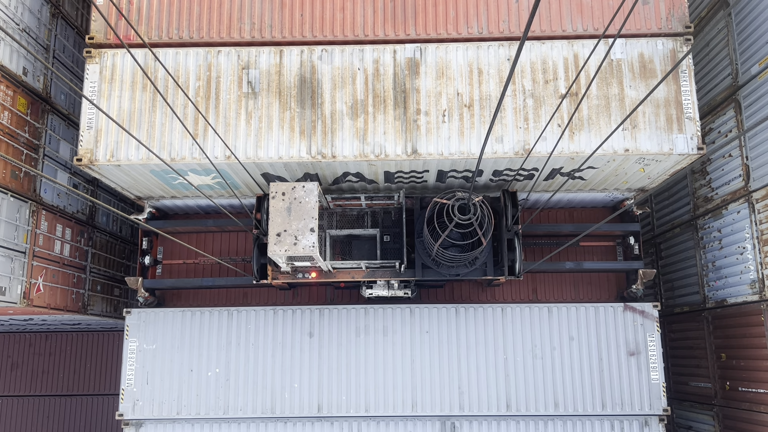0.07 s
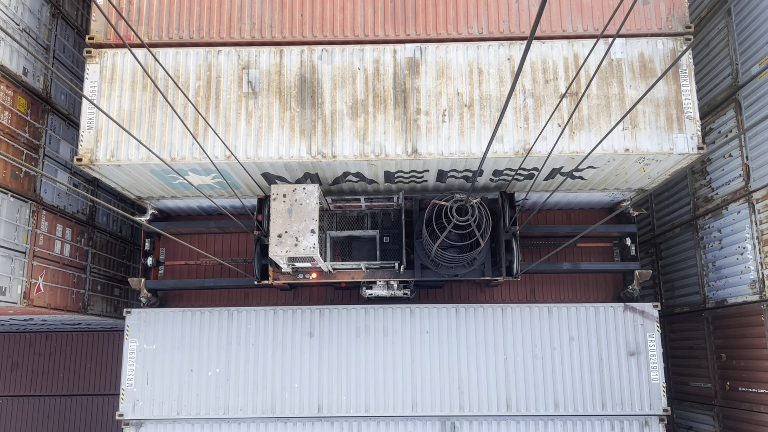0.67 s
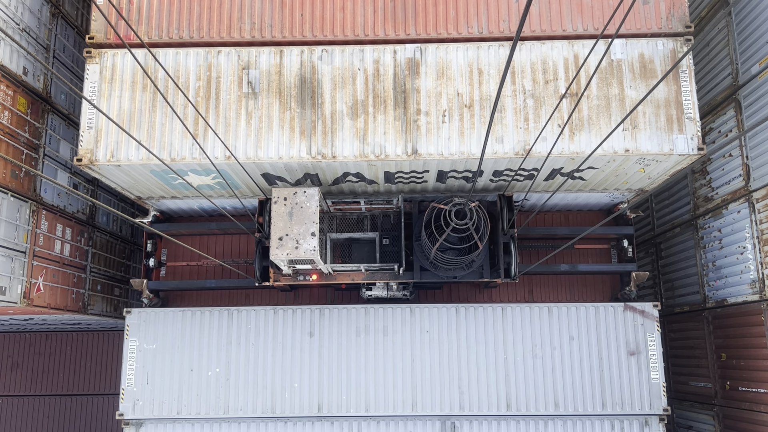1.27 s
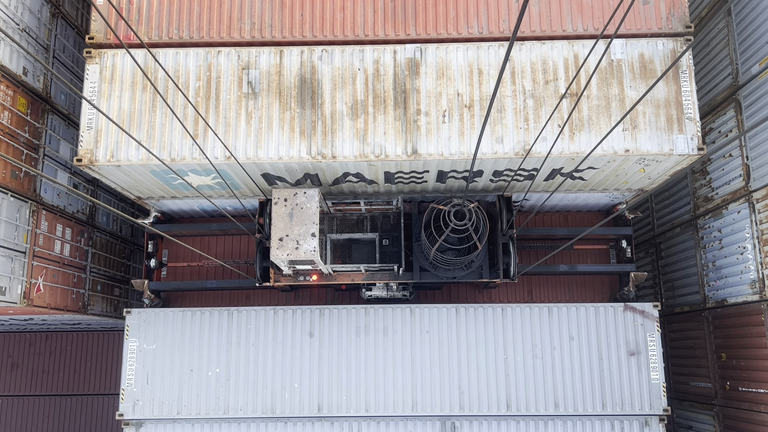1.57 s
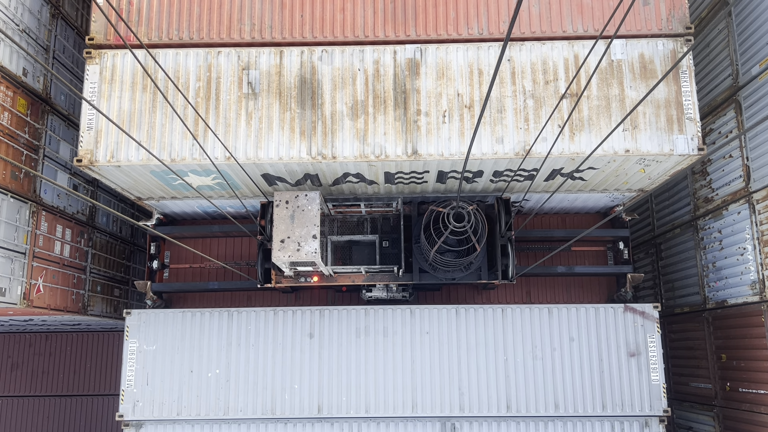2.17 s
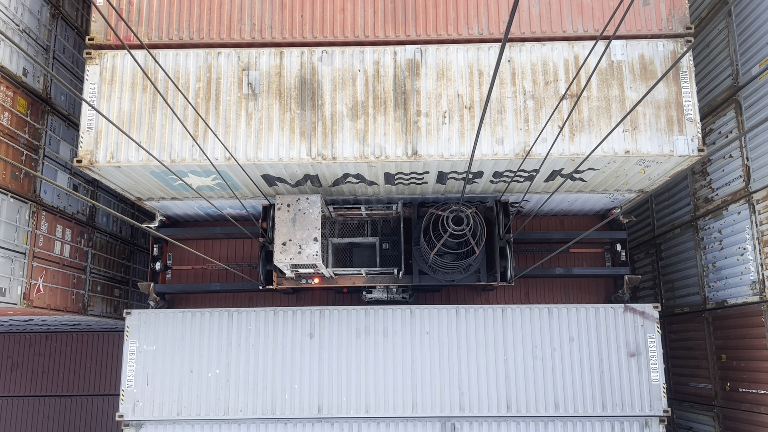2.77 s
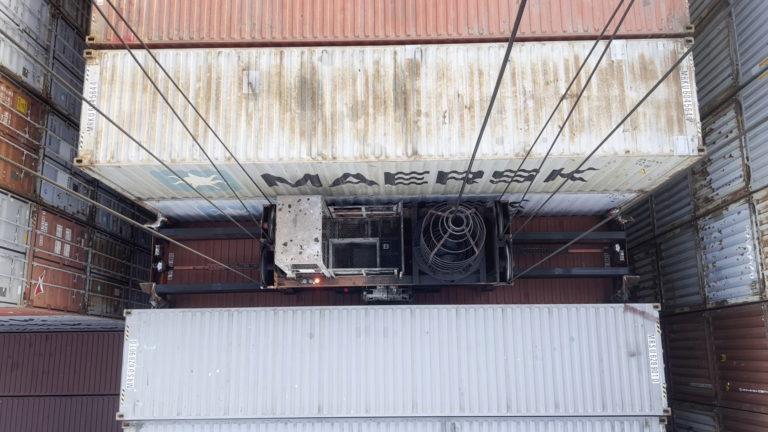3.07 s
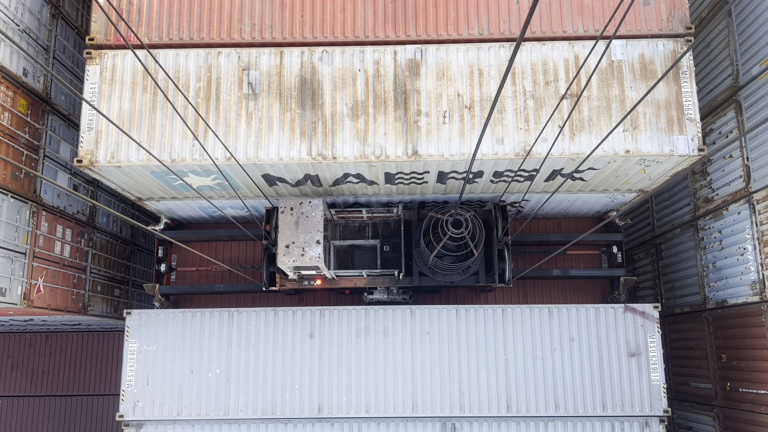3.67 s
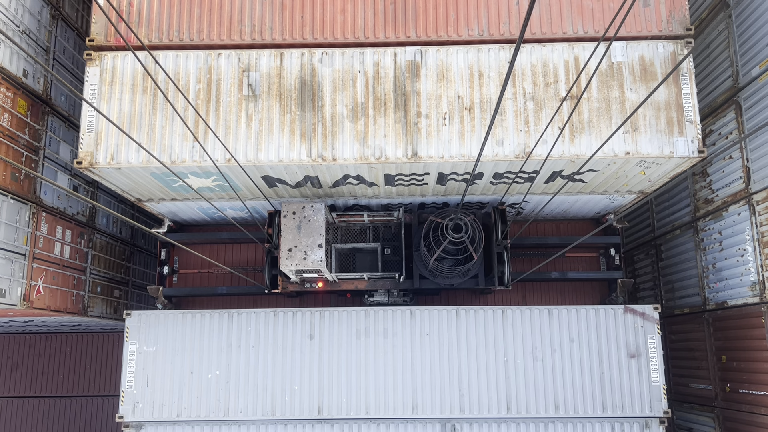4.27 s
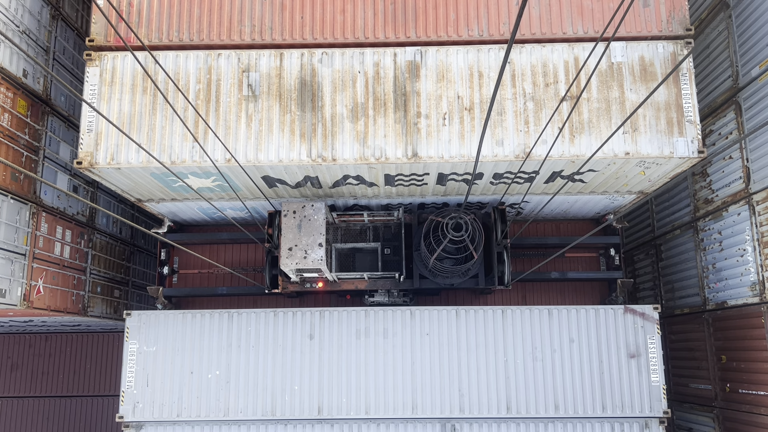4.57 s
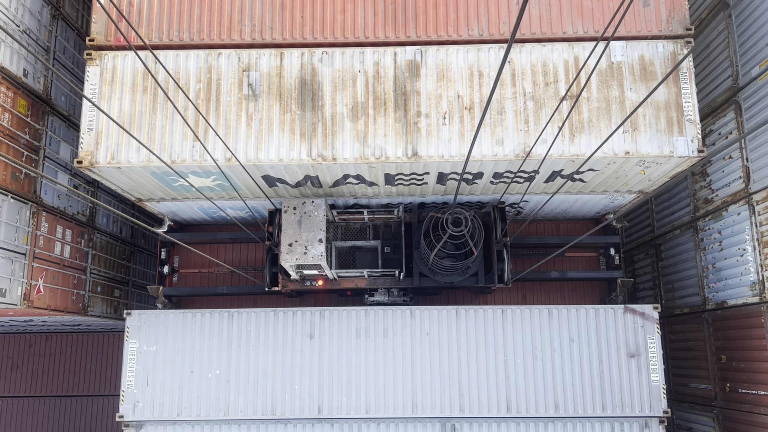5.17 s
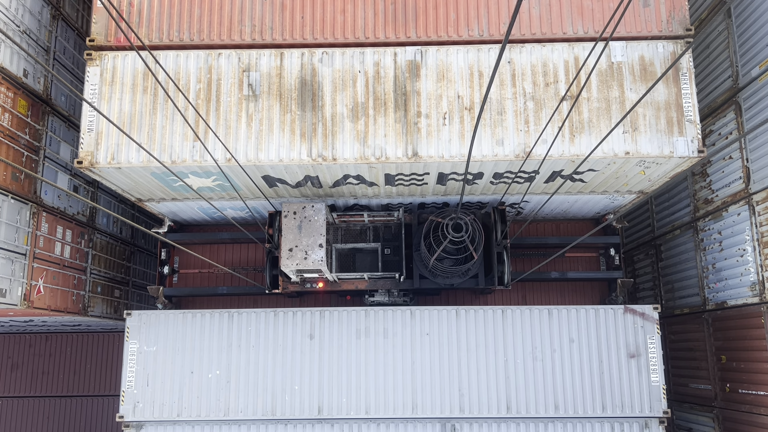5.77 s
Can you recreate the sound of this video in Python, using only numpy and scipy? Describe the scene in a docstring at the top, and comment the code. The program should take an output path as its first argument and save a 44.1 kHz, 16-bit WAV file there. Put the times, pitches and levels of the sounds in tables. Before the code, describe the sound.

A crane cab booms and drones while a muffled hoist pulls hard, then eases, leaving thin, faint rope squeals. A brief metal screech breaks in with a rapid cluster of heavy, echoing blows as the spreader knocks into place, and the cab shudders. Light metallic ticks and a single sharp clank follow nearby. Everything is heard from the driver's seat, with the low machinery rumble running throughout.

```python
"""Inside a container crane's cab

The cab booms and the hoist roars while the ropes squeal faintly in their pulleys. The spreader,
the frame that grips a container, screeches along the steel guides and crashes into place in a run
of blows that echo in the ship's hold. Then loose steel ticks in the shaken cab and gives one
bright clank."""
import sys
import numpy as np
from scipy import signal
from scipy.fft import rfft, irfft, next_fast_len
from scipy.io import wavfile
from scipy.ndimage import uniform_filter1d

SR = 44100
rng = np.random.default_rng(int(sys.argv[2]) if len(sys.argv) > 2 else 0)


def bounce(signal):
    """Save signal as a 16-bit WAV file at the path given by the first command-line argument."""
    frames = np.transpose(np.atleast_2d(signal))
    limited = np.clip(frames, -1, 1)
    pcm = np.round(limited * 32767).astype(np.int16)
    wavfile.write(sys.argv[1], SR, pcm)


N = 260631
TIME = np.arange(N) / SR
SIZE = next_fast_len(N, True)
FREQS = np.maximum(np.arange(SIZE // 2 + 1) * SR / SIZE, 1)


def from_db(db):
    """Turn decibels into a number to multiply by."""
    return 10 ** (np.asarray(db) / 20)


def rms_one(x):
    """Scale a signal to an average strength (rms) of one."""
    return x / np.sqrt(np.mean(x ** 2) + 1e-20)


def at_hz(points, hz=FREQS):
    """Read between the rows of a table, giving every octave equal room."""
    f, value = np.transpose(points)
    return np.interp(np.log(hz), np.log(f), value)


def bell(hz, width):
    """One resonance, a pitch at which a thing likes to ring: a hump of height one."""
    return 1 / (1 + (2 * (FREQS - hz) / width) ** 2)


def resonances(modes):
    """Tone colour of a thing that sounds only at its resonances."""
    return sum(from_db(db) * bell(hz, width) for hz, width, db in modes)


def lifted(modes):
    """An even tone colour with resonances standing out; a negative dB value lifts too."""
    return np.sqrt(1 + sum((from_db(abs(db)) ** 2 - 1) * bell(hz, width) for hz, width, db in modes))


def drift(rate_hz):
    """A slow random wobble, about one in size."""
    return rms_one(irfft(rfft(rng.standard_normal(SIZE)) / (1 + (FREQS / rate_hz) ** 2), SIZE)[:N])


def steadied(x, seconds):
    """Even out the slow swells of a vibration, keeping its fast throb."""
    span = max(int(seconds * SR), 2)
    power = uniform_filter1d(uniform_filter1d(np.mean(x ** 2, axis=0), span), span)
    return x / np.sqrt(np.abs(power) + 1e-9)


def swells(rows):
    """Power of swells that build smoothly to a peak, then fade at a steady rate."""
    power = np.zeros(N)
    for peak, db, build_s, fade_db_per_s in rows:
        building = np.exp(-(np.minimum(TIME - peak, 0) / build_s) ** 2)
        power += building * from_db(db - fade_db_per_s * np.maximum(TIME - peak, 0)) ** 2
    return power


def held(start, length, build_s, release_s=0.019):
    """Loudness of rubbing: it builds up, holds and lets go quickly."""
    release = np.exp(-np.clip((TIME - start - length) / release_s, 0, 20))
    return np.clip((TIME - start) / build_s, 0, 1) * release


def flare(start, peak, ring_s):
    """Loudness that rises to a peak and rings out; a ring time is how long it takes to drop 60 dB."""
    rise = np.clip((TIME - start) / max(peak - start, 1e-3), 0, 1)
    fade_db = -60 * np.maximum(TIME - peak, 0) / ring_s
    return rise * from_db(np.maximum(fade_db, -200))


# how alike left and right are: f/Hz, likeness from 0 to 1
STEREO_LIKENESS = [(60, .999), (190, .98), (340, .91), (520, .6), (850, .25), (1200, .45), (1600, .88),
                   (2100, .96), (2600, .8), (3150, .35), (4200, .65), (5000, .45), (5600, .83), (6800, .99),
                   (8000, .83), (10200, .45), (11400, .88), (13000, .98)]
# how far the left wave runs ahead of the right: f/Hz, lead/rad
LEFT_LEAD = [(450, 0), (850, 1.1), (1200, .4), (2000, 0), (2800, 0), (3200, -.6), (4300, -.6), (4750, -1.4),
             (5000, -3.2), (5250, -5.2), (5700, -6.15), (7300, -6.35), (7900, -6.8), (9300, -7),
             (10400, -8.2), (11500, -8.6), (12200, -9.4)]
# how much louder the left side is: f/Hz, level/dB
LEFT_LEVEL = [(60, 0), (110, -.5), (190, -.6), (340, -1.5), (620, -4.2), (1100, -1.6), (2000, -.4),
              (3500, .3), (6300, 0)]
SIDES = np.array([[1], [-1]])   # left, right

def noise(colour):
    """Stereo noise with the given tone colour and a strength of one."""
    shared, apart = rfft(rng.standard_normal((2, SIZE)))
    alike = at_hz(STEREO_LIKENESS)
    pair = np.sqrt(1 + alike) * shared + SIDES * np.sqrt(1 - alike) * apart
    pair[0] *= np.exp(1j * at_hz(LEFT_LEAD))
    balance = from_db(SIDES * at_hz(LEFT_LEVEL) / 2)
    return rms_one(irfft(pair * colour * balance, SIZE)[:, :N])


def note(hz, wander):
    """A stereo tone whose pitch wanders by a small share."""
    pitch = hz * (1 + wander * drift(29.9))
    phase = 2 * np.pi * (np.cumsum(pitch) / SR + rng.random())
    balance = from_db(SIDES * at_hz(LEFT_LEVEL, hz) / 2)
    return np.sqrt(2) * np.sin(phase + [[at_hz(LEFT_LEAD, hz)], [0]]) * balance


def hit_energy(hits, hz):
    """One spike of energy for each hit, weaker where hz lies above the hit's dulling point."""
    start, level_db, dull_hz = np.transpose(hits)
    energy = np.full(N, 1e-18)
    energy[(start * SR).astype(int)] = from_db(level_db) ** 2 / (1 + (hz / dull_hz) ** 2)
    return energy


def ringing(energy, ring_s):
    """Let each spike of energy die away, by 60 dB in ring_s."""
    return signal.lfilter([1], [1, -np.exp(-np.log(1e6) / (ring_s * SR))], energy)


def struck(hits, colour, ring_times, crack_db, crack_s, rise_s):
    """Struck steel: each hit gives every octave a short crack and then a longer ring."""
    spectrum = rfft(noise(colour), SIZE)
    centres = np.geomspace(200, 12800, 7)
    keep = np.exp(-1 / (rise_s * SR))   # the energy takes a moment to spread through the steel
    out = np.zeros((2, N))
    for hz in centres:
        octave = np.interp(np.log(FREQS), np.log(centres), centres == hz)
        band = irfft(spectrum * octave, SIZE)[:, :N]
        energy = hit_energy(hits, hz)
        ring = ringing(energy, at_hz(ring_times, hz))
        crack = from_db(crack_db) ** 2 * signal.lfilter([1], [1, -np.exp(-1 / (crack_s * SR))], energy)
        out += band * np.sqrt(signal.lfilter([1 - keep], [1, -keep], ring + crack))
    return out


# tone colour of the moving air: f/Hz, relative level/dB
AIR_COLOUR = [(1000, -5), (3000, 3), (4700, -4), (5300, 5.5), (6000, -1), (6800, -9), (7900, -4.5),
              (8400, -16), (11000, -19.5)]

def ventilation():
    """Air hisses faintly and steadily in the cab."""
    return from_db(-57.5) * noise(from_db(at_hz(AIR_COLOUR)))


# heavy loads shake the crane: peak t/s, build-up/s, base fade/(dB/s), frame/dB, floor/dB, walls/dB
SHUDDERS = [(0.1, 0.44, 11.5, -18, -17, -20.5), (0.7, 0.18, 10.5, -24.5, -21.5, -25.5),
            (4.0, 0.17, 14, -31.5, -28, -39.5), (4.27, .15, 20.5, -16, -13.5, -18.5),
            (4.8, 0.16, 10.5, -24.5, -23, -27), (5.27, 0.085, 20, -23.5, -18.5, -29.5)]
FRAME, FLOOR, WALLS = 0, 1, 2

def shaking(part):
    """How hard one part of the cab shakes: an idle tremble plus the shudders."""
    idle_db = (-33, -34, -35.5)[part]
    fade_ratio = (0.66, 1.02, 0.99)[part]   # the frame rings on longer than the light panels
    rows = [(peak, dbs[part], build_s, fade * fade_ratio) for peak, build_s, fade, *dbs in SHUDDERS]
    return np.sqrt(from_db(idle_db) ** 2 + swells(rows))


# tone colours of the cab's frame, floor and walls: f/Hz, relative level/dB
FRAME_RUMBLE = [(15, -22.5), (30, -21.5), (42, -16.5), (50, -13.5), (56, -0.5), (76, -3), (90, -16),
                (200, -48.5), (2000, -140)]
FLOOR_BOOM = [(40, -43), (70, -15), (82, -1), (112, -2), (128, -6.5), (148, -12), (220, -30), (3000, -140)]
WALL_DRONE = [(90, -22), (145, -3), (170, 1), (215, 4), (238, -2), (290, -6.5), (310, -3.5), (430, -8.5),
              (600, -15.5), (1200, -38.5), (5000, -120)]
# resonances (modes) of the same three parts: f/Hz, width/Hz, lift/dB
FRAME_MODES = [(60.8, 4.4, 6.5), (73, 8, 2.5)]
FLOOR_MODES = [(96.7, 6.1, 6), (107, 11, 2.5)]
WALL_MODES = [(181.4, 9.5, 7.7), (312, 19, 3.5), (361, 11, 8), (419, 8, 4), (453, 8.8, 5.5), (536, 21, 2.3),
              (576, 16, 6)]
# dull thuds through the frame: t/s, level/dB
THUDS = [(0.14, -12), (0.64, -14), (1.12, -21), (2.02, -23.5), (4.42, -11), (4.77, -19), (5.2, -17),
         (5.78, -15)]

def cab(thud_s=0.03):
    """Frame, floor and walls boom as the crane shakes them; thuds go through the frame."""
    frame = steadied(noise(lifted(FRAME_MODES) * from_db(at_hz(FRAME_RUMBLE))), seconds=0.11)
    floor = steadied(noise(lifted(FLOOR_MODES) * from_db(at_hz(FLOOR_BOOM))), seconds=0.15)
    walls = steadied(noise(lifted(WALL_MODES) * from_db(at_hz(WALL_DRONE))), seconds=0.13)
    thud_power = sum(from_db(db) ** 2 * np.exp(-((TIME - t) / thud_s) ** 2) for t, db in THUDS)
    frame_shake = np.sqrt(shaking(FRAME) ** 2 + thud_power)
    return frame * frame_shake + floor * shaking(FLOOR) + walls * shaking(WALLS)


# the hoist pulls harder for a moment: peak t/s, relative level/dB, build-up/s, fade/(dB/s)
PULLS = [(0, -25.5, .2, 26), (0.52, -30.5, 0.075, 14.5), (0.845, -25, 0.25, 20.5), (1.95, -38, 0.12, 14.5),
         (3.58, -45, 0.06, 14), (4.75, -32, 0.24, 16), (5.25, -38, 0.059, 22), (5.72, -37, 0.053, 30)]

def hoist_effort(idle_db=-41):
    """How hard the hoist works: idling plus the pulls."""
    return np.sqrt(from_db(idle_db) ** 2 + swells(PULLS))


# tone colour of the roar: f/Hz, relative level/dB
ROAR_COLOUR = [(200, -12.5), (430, 1), (800, -6.5), (1100, -7), (1500, -11.5), (2150, -12), (2550, -15),
               (3100, -26), (3600, -30.5), (4900, -29), (5300, -28), (5900, -33), (6900, -42.5),
               (8500, -50), (11000, -60)]
# cab resonances that colour the roar and the crash: f/Hz, width/Hz, lift/dB
CAB_MODES = [(589, 30, 4), (649, 24, 3.5), (741, 14, 3), (899, 30, 3), (1325, 30, 3), (1780, 24, 2.5),
             (2089, 36, 4), (2201, 18, 5), (2507, 24, 3), (5570, 120, 3)]

def hoist_roar():
    """Drums and running ropes roar with each pull, muffled by the cab windows."""
    flutter_db = 0.32 * drift(25)
    roar = noise(from_db(at_hz(ROAR_COLOUR)) * lifted(CAB_MODES))
    return roar * hoist_effort() * from_db(flutter_db + 2.5)


# pairs of close resonances that throb in the hum and the panels: f/Hz, width/Hz, relative level/dB
HUM_MODES = [(254.6, 16, -2), (266.6, 14, 4.5)]
PANEL_MODES = [(253.6, 14, 4), (268, 18, -1)]
# the load sets the panels ringing: peak t/s, level/dB, build-up/s, fade/(dB/s)
PANEL_SWELLS = [(0.75, -22, .17, 20.5), (2.02, -35, 0.07, 9), (4.33, -18.5, 0.17, 22.5)]

def hoist_hum(idle_db=-39.5):
    """The drive hums louder as it works and as the walls shake; panels ring under the load."""
    hum_power = hoist_effort() ** 2 + (shaking(WALLS) * from_db(-10)) ** 2 + from_db(idle_db) ** 2
    hum = steadied(noise(resonances(HUM_MODES)), seconds=0.28)
    panels = steadied(noise(resonances(PANEL_MODES)), seconds=0.15)
    return hum * np.sqrt(hum_power) + panels * np.sqrt(swells(PANEL_SWELLS))


# resonances of the rasping ropes: f/Hz, width/Hz, relative level/dB
RASP_MODES = [(2000, 80, 0), (2204, 100, -6.5), (2415, 24, 1.5)]
# the rasp late in the hard pull: peak t/s, level/dB, build-up/s, fade/(dB/s)
RASPS = [(0.9, -36, 0.14, 23.5)]

def rope_rasp():
    """The loaded ropes rasp as they wind over the drum."""
    return noise(resonances(RASP_MODES)) * np.sqrt(swells(RASPS))


# the ropes catch a note: t/s, length/s, f/Hz, level/dB
SQUEALS = [(1.12, 0.4, 2576, -48), (1.53, 0.56, 2570, -54.5), (2.1, .835, 2560, -47.5),
           (2.09, 0.26, 2690, -47), (2.405, .055, 2700, -51), (2.54, .1, 2702, -54), (2.15, .4, 3792, -67),
           (2.55, .2, 2955, -61), (2.97, .07, 2690, -54), (3.01, .2, 2560, -51.5), (3.18, .24, 2562, -57),
           (3.6, .1, 7810, -69)]
# the ropes only rub: t/s, length/s, f/Hz, width/Hz, level/dB
RUBS = [(1.85, 0.22, 1910, 50, -51), (3.22, .22, 2640, 140, -58.5), (3.27, .025, 4500, 170, -57),
        (3.36, .11, 1895, 110, -51), (3.51, .07, 3680, 700, -58), (3.25, .06, 7820, 110, -70),
        (3.3, .38, 7810, 160, -70.5)]

def pulleys():
    """Ropes in the pulleys sing thin notes where they grip and rub hoarsely where they do not."""
    squeals = sum(note(hz, wander=0.0012) * held(start, length, build_s=0.64 * length) * from_db(db)
                  for start, length, hz, db in SQUEALS)
    rubs = sum(noise(bell(hz, width)) * held(start, length, build_s=0.03) * from_db(db)
               for start, length, hz, width, db in RUBS)
    uneven_grip_db = 1.7 * drift(25)
    return (squeals + rubs) * from_db(uneven_grip_db)


# light taps of loose steel: t/s, relative level/dB, dull above f/Hz
TICKS = [(4.585, -42.5, 12000), (4.685, -39.5, 16000), (4.800, -46, 14000), (4.812, -42.5, 14000),
         (4.835, -43, 12000), (4.885, -42.5, 6000), (4.970, -38.5, 15000), (5.175, -50, 6000),
         (5.215, -47, 8100), (5.253, -40.5, 16000), (5.358, -45, 16000), (5.533, -39, 6000),
         (5.823, -45.5, 8000)]
# their tone colour: f/Hz, relative level/dB
TICK_COLOUR = [(1000, -1.5), (3000, -1.5), (4500, -2), (5700, 4.5), (7000, -7), (8000, -6), (10000, -16),
               (12000, -15)]
# how long steel rings in the cab: f/Hz, ring time/s
CAB_RING = [(300, 0.63), (2000, 0.28), (6000, 0.36), (7500, 0.5), (12000, 0.32)]

def ticks():
    """Loose steel ticks lightly, close by."""
    colour = from_db(at_hz(TICK_COLOUR))
    return from_db(-2.5) * struck(TICKS, colour, CAB_RING, crack_db=5, crack_s=0.005, rise_s=0.0006)


# hard knocks of loose steel: t/s, relative level/dB, dull above f/Hz
CLANKS = [(0.0, -40.5, 9000), (5.253, -39, 3000), (5.378, -28.5, 20000), (5.387, -22.5, 6000),
          (5.393, -19, 4000), (5.401, -36, 14100), (5.420, -31, 10000), (5.489, -43, 9000),
          (5.823, -52, 3000)]
# their tone colour: f/Hz, relative level/dB
CLANK_COLOUR = [(300, -12), (600, 2.5), (1500, -12.5), (2200, 0), (3000, -13.5), (4300, -6.5), (5000, -5.5),
                (5800, -5.5), (6800, -16), (8500, -17), (10500, -20.5), (12000, -24.5)]
# clusters of close resonances in the steel: f/Hz, width/Hz, lift/dB
CLANK_MODES = [(2050, 80, 4.5), (2380, 150, 6.5), (4020, 60, 6), (7410, 90, 19.5), (11460, 190, 28)]
# its clear notes: f/Hz, level against the knock/dB, ring time/s
CLANK_NOTES = [(1978, -12.5, .25), (2110, -8, .2), (3203, -20.5, .18), (6024, -20, .21), (7461, -16.5, .38)]

def clank():
    """Loose steel knocks hard; each knock feeds a noisy ring and clear notes that fade on their own."""
    colour = from_db(at_hz(CLANK_COLOUR)) * lifted(CLANK_MODES)
    clatter = struck(CLANKS, colour, CAB_RING, crack_db=2, crack_s=0.0029, rise_s=0.00065)
    notes = sum(note(hz, wander=0.001) * from_db(db) * np.sqrt(ringing(hit_energy(CLANKS, hz), ring_s))
                for hz, db, ring_s in CLANK_NOTES)
    return from_db(-0.8) * clatter + notes


# tone colour of the clank's first contact: f/Hz, relative level/dB
SNAP_COLOUR = [(1500, -6), (2200, 0), (5000, -4), (10000, -5), (11500, 5)]

def snap(start_s=5.378, level_db=-27, decay_s=0.0018):
    """A dry, bright contact opens the clank."""
    fall = (TIME >= start_s) * np.exp(-np.clip((TIME - start_s) / decay_s, 0, 30))
    return noise(from_db(at_hz(SNAP_COLOUR))) * from_db(level_db) * fall


# rough resonances of the guide as steel sticks and slips on it:
# f/Hz, half-width/Hz, level/dB, start t/s, peak t/s, ring time/s, share by which the pitch starts high
SCREECH_MODES = [(567, 33, -22, 4.04, 4.053, 0.33, 0), (1920, 41, -30.5, 4.05, 4.11, 0.38, 0.011),
                 (2236, 120, -21, 4.057, 4.072, 0.5, .12), (2153, 88, -25.5, 4.11, 4.172, 0.99, 0),
                 (2770, 80, -31.5, 4.055, 4.075, 0.74, 0.085), (3260, 90, -35, 4.03, 4.08, 0.68, 0.0073),
                 (5160, 80, -29, 4.056, 4.085, 0.38, 0), (5600, 220, -28, 4.046, 4.062, 0.69, 0),
                 (6300, 90, -33.5, 4.046, 4.066, 0.14, 0), (7650, 770, -41, 4.052, 4.072, 0.71, 0.0027)]
# notes the guide locks on to: f/Hz, level/dB, start t/s, peak t/s, ring time/s
GUIDE_NOTES = [(587, -21.5, 4.038, 4.056, 0.24), (5600, -29.5, 4.046, 4.075, 0.39)]

def screech(slows_at_s=4.1, slowing_s=0.0138):
    """Steel slips on steel: two notes sing and rough resonances flare, some sinking as the slip slows."""
    speed = 0.5 - 0.5 * np.tanh((TIME - slows_at_s) / (2 * slowing_s))
    slip_left = np.cumsum(speed[::-1])[::-1] / SR
    out = np.zeros((2, N))
    for hz, half_width, db, start, peak, ring_s, sharp in SCREECH_MODES:
        rough = steadied(noise(bell(hz, 2 * half_width)), seconds=0.02)
        pitch_shift = np.exp(-2j * np.pi * hz * sharp * slip_left)   # higher while the slip is fast
        sliding = np.real(signal.hilbert(rough, SIZE)[:, :N] * pitch_shift)
        out += sliding * flare(start, peak, ring_s) * from_db(db)
    for hz, db, start, peak, ring_s in GUIDE_NOTES:
        out += note(hz, wander=0.00405) * flare(start, peak, ring_s) * from_db(db + 1.5 * drift(60))
    return out


# knocks of the container's walls during the crash: t/s, level/dB, f/Hz
WALL_KNOCKS = [(4.121, -12.5, 344), (4.167, -10.5, 245), (4.243, -16, 521), (4.324, -15, 497),
               (4.398, -11.5, 262)]

def container_knocks():
    """Each jolt makes a different wall panel of the container knock, short and hollow."""
    out = np.zeros((2, N))
    for start, db, hz in WALL_KNOCKS:
        panel = steadied(noise(bell(hz, width=103)), seconds=0.015)
        out += panel * flare(start, peak=start + 0.009, ring_s=0.15) * from_db(db)
    return out


def rattle(per_s=130, swell_s=0.0013, share=0.3):
    """Flickering loudness from many tiny, uneven collisions; the average power stays the same."""
    sizes = (rng.random(N) < per_s / SR) * rng.uniform(0.3, 1.7, N)
    keep = np.exp(-1 / (swell_s * SR))
    power = signal.lfilter([1], [1, -2 * keep, keep ** 2], sizes + 1e-18)
    return np.sqrt(1 - share + share * power / power.mean())


# the spreader hits the guides: t/s, relative level/dB, dull above f/Hz
BLOWS = [(4.026, -34.5, 1210), (4.068, -27.5, 5000), (4.098, -25.5, 9050), (4.12, -21, 2000),
         (4.148, -19.5, 8000), (4.168, -21.5, 6980), (4.208, -20, 14000), (4.248, -22.5, 2790),
         (4.292, -20.5, 1800), (4.326, -19.5, 1510), (4.383, -21.5, 1580), (4.444, -29, 4050),
         (4.575, -39, 6000)]
# tone colour of the blows: f/Hz, relative level/dB
CRASH_COLOUR = [(150, -16), (270, -3), (340, -0.5), (600, -3), (1000, -5), (1700, -7.5), (2200, -3),
                (3100, -13.5), (4800, -17.5), (5500, -16.5), (7000, -26), (9000, -35.5), (11000, -40.5)]
# hollow resonances of the struck container: f/Hz, width/Hz, lift/dB
CONTAINER_MODES = [(305, 18, 9.5), (334, 21, 7.5), (364, 17, 4), (630, 15, -0.5)]
# how long the hold echoes: f/Hz, ring time/s
HOLD_RING = [(200, 1.37), (1000, 1.7), (2200, 1.08), (4000, 0.59), (10000, 1.65)]

def crash():
    """The spreader bangs down the guides, rattling between the blows; the hold rings on."""
    colour = from_db(at_hz(CRASH_COLOUR)) * lifted(CONTAINER_MODES) * lifted(CAB_MODES)
    blows = struck(BLOWS, colour, HOLD_RING, crack_db=3.5, crack_s=0.0088, rise_s=0.0046)
    return blows * rattle() * from_db(1)


def scene():
    """Everything as heard from the driver's seat."""
    background = cab() + hoist_roar() + hoist_hum() + rope_rasp() + ventilation() + pulleys()
    landing = screech() + crash() + container_knocks()
    loose_steel = clank() + ticks() + snap()
    return background + landing + loose_steel


def record(dry):
    """Round off the tallest peaks and cut the treble above 11900 Hz."""
    rounded = dry / (1 + (dry / 0.97) ** 6) ** (1 / 6)
    treble_cut = signal.ellip(10, 0.2, 80, 11900, fs=SR, output="sos")
    return signal.sosfilt(treble_cut, rounded)


dry = scene()
out = record(dry)
bounce(out)
```